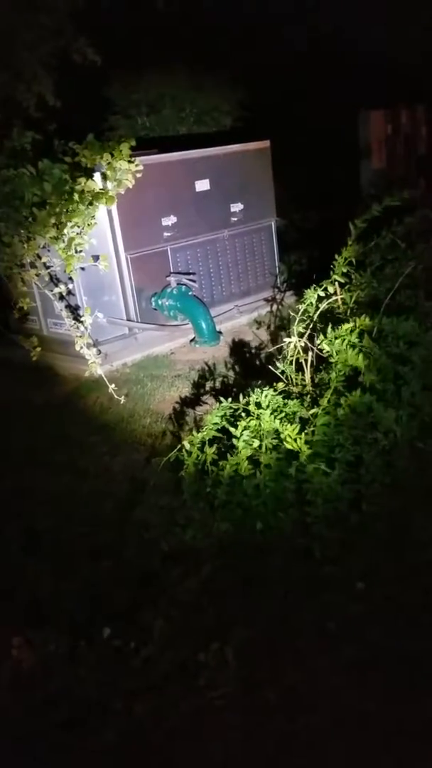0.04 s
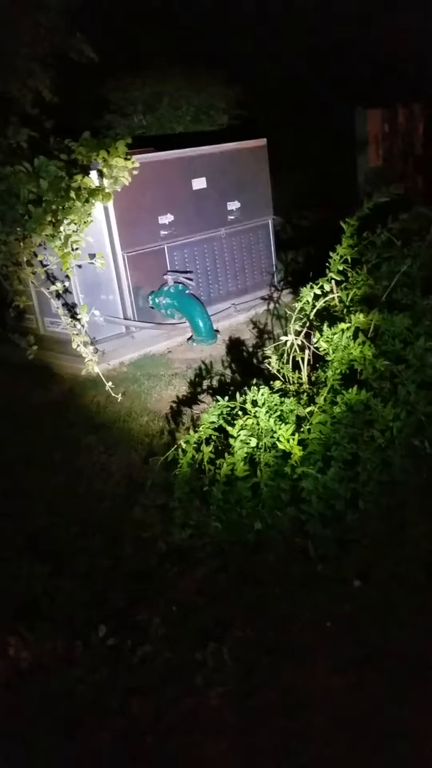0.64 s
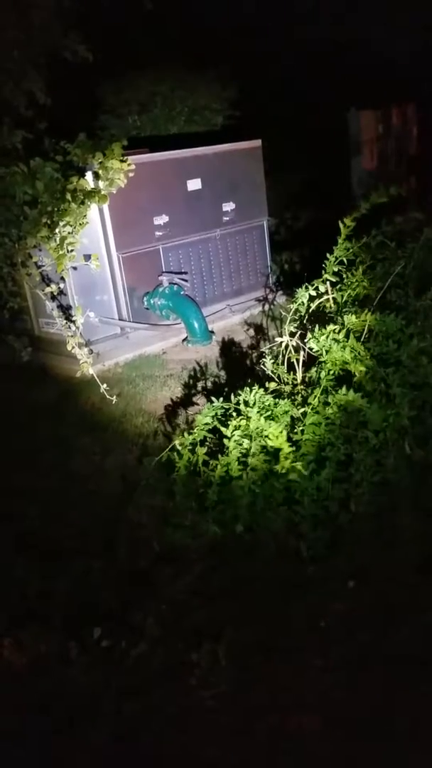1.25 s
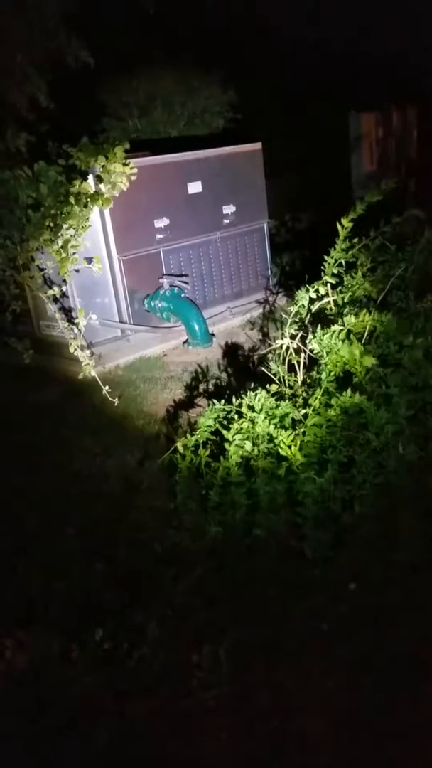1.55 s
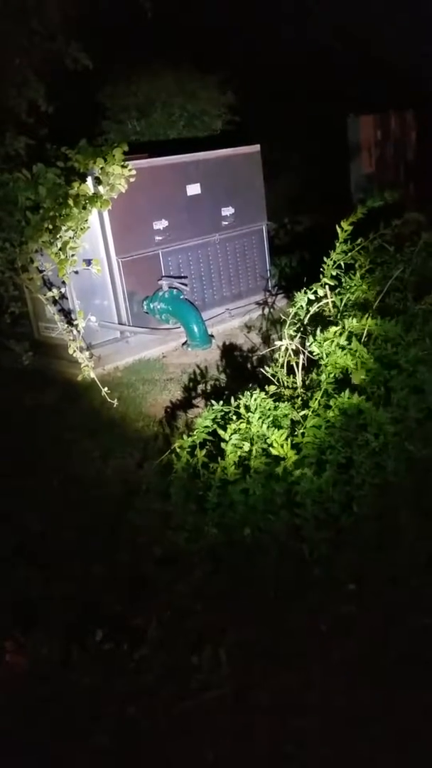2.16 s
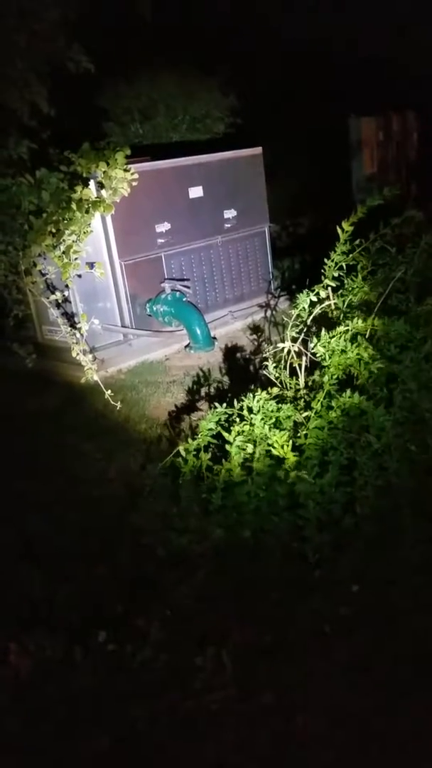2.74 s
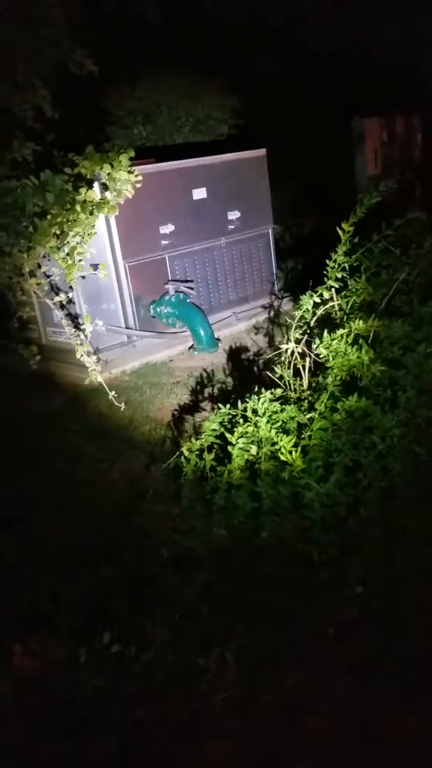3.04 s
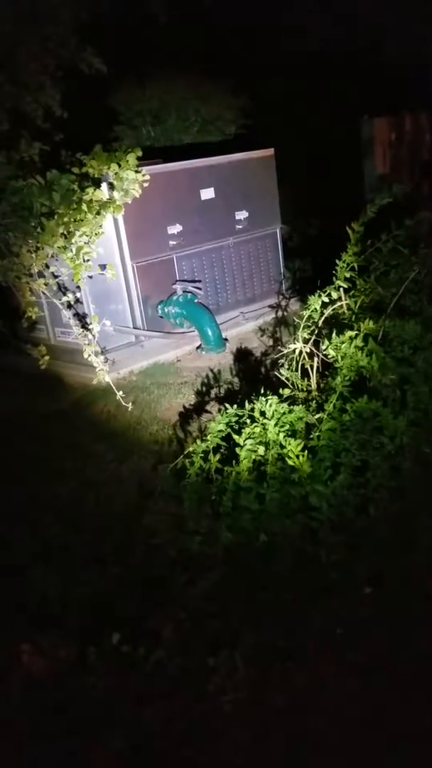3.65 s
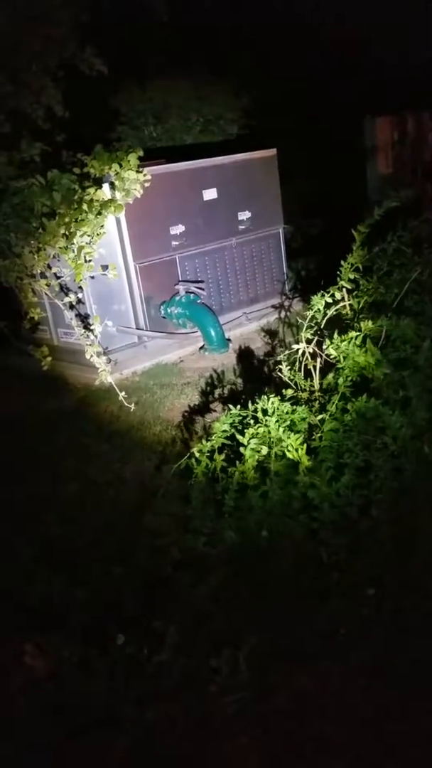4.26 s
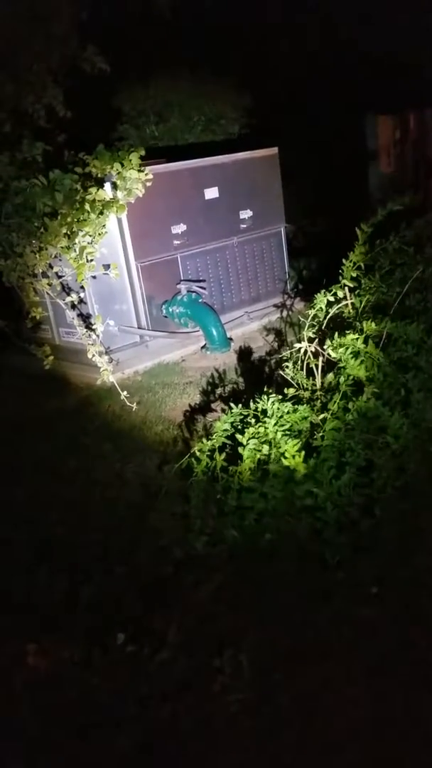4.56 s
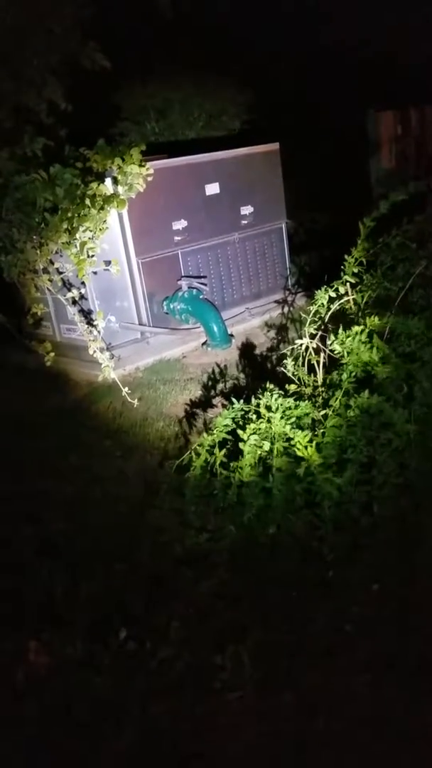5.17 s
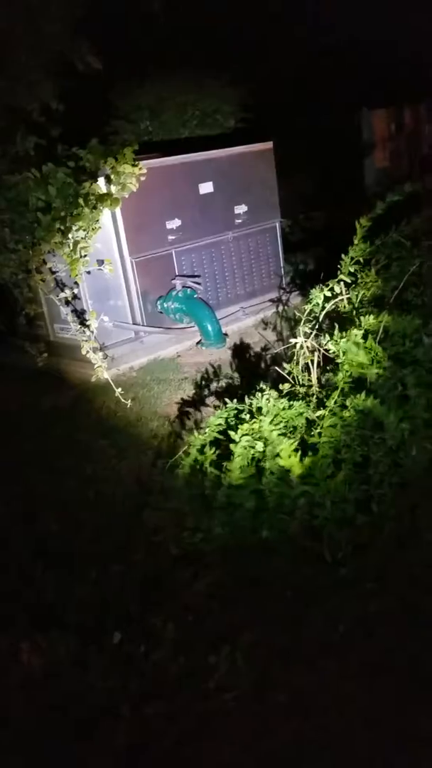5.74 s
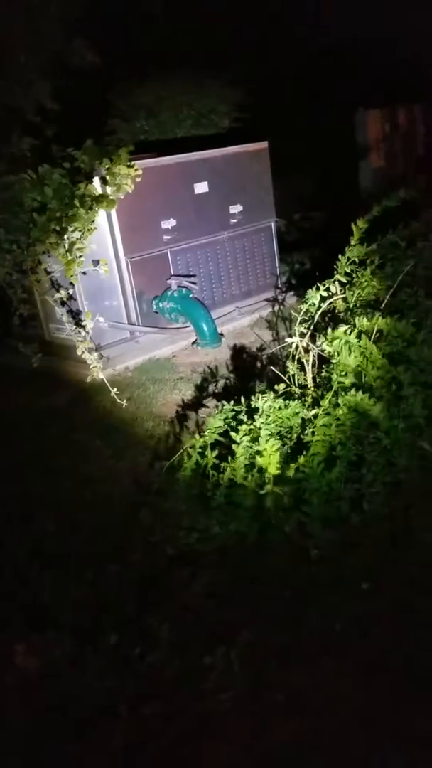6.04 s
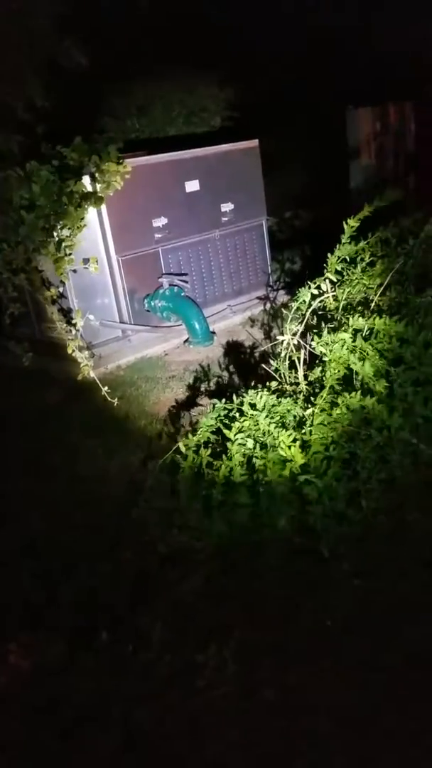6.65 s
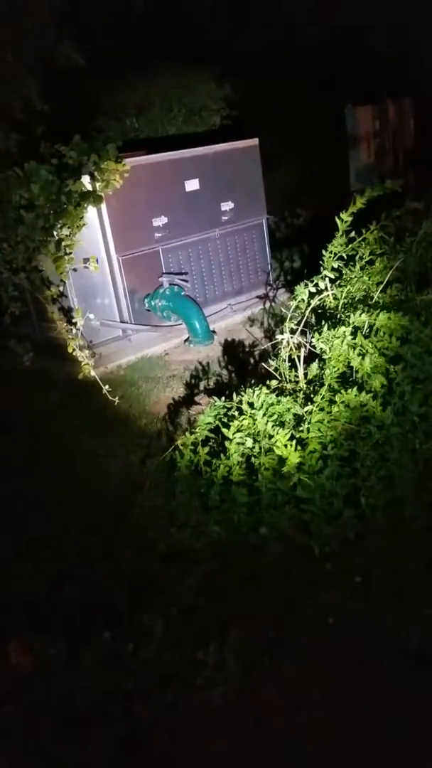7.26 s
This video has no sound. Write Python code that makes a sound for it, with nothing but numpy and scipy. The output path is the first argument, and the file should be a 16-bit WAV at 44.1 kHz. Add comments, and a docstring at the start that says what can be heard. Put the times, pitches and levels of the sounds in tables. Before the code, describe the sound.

A deep motor drone and an even rush of air and water come from a pump in an outdoor metal cabinet, heard from one spot, with a faint high whine on top. After a long steady run the drone falters, sinks slightly in pitch and booms as water swishes briefly. The whine blurs into hiss, the pipe whistles twice on one note, and the pump settles to a softer idle.

```python
"""Outdoors at night, a pump motor runs in a steel cabinet: a deep shaft hum, a rush of air and water,
a thin drive whine. Near the end the drive eases off: the shaft shake dies away, the third order sinks
into a cabinet resonance and booms, water swishes in the pipe and the whine smears into hiss.
Then the pipe sings, and the booming drone and the rush fall away as the pump drops to idle."""
import sys
import numpy as np
from scipy.fft import rfft, irfft, next_fast_len
from scipy.io import wavfile
from scipy.ndimage import map_coordinates

SR = 44100
rng = np.random.default_rng(int(sys.argv[2]) if len(sys.argv) > 2 else 0)


def persist_wave(psi):
    """Save psi, clipped to +-1, as 16-bit WAV."""
    counts = np.round(np.clip(psi, -1, 1) * 32767).astype(np.int16)
    wavfile.write(sys.argv[1], SR, np.atleast_2d(counts).T)


N = 330750

# The pump winds down in two steps: full load, eased, idle. Each fade spans twice its half-length.
EASE_S, EASE_HALF_S = 6.235, 0.0078
IDLE_S, IDLE_HALF_S = 6.92, 0.045


def amp(db):
    """Decibels to gain."""
    return 10 ** (np.asarray(db) / 20)


def unit(x):
    """Scale to rms 1."""
    return x / np.sqrt(np.mean(x ** 2) + 1e-20)


def along(points, hz):
    """Read a curve of (Hz, value) points on a log frequency axis."""
    freqs, values = np.transpose(points)
    return np.interp(np.log(hz + 1), np.log(freqs + 1), values)


def seconds():
    """The time of every sample."""
    return np.arange(N) / SR


def fade_in(centre_s, half_s):
    """A smooth step from 0 to 1 around centre_s."""
    return (1 + np.tanh((seconds() - centre_s) / half_s)) / 2


def swell(peak_s, half_s):
    """A smooth rise to 1 at peak_s and back."""
    return np.exp(-((seconds() - peak_s) / half_s) ** 2)


def wobble(rate):
    """A smooth random curve with `rate` knots a second."""
    knots = rng.standard_normal(int(N * rate / SR) + 4)
    return map_coordinates(knots, [np.arange(N) * rate / SR])


def load_fader(full_db, eased_db, idle_db, idle_lag_s=0):
    """Gain of a layer as the pump steps from full load to eased to idle."""
    eased = fade_in(EASE_S, EASE_HALF_S)
    idle = fade_in(IDLE_S + idle_lag_s, IDLE_HALF_S)
    return amp(full_db + (eased_db - full_db) * eased + (idle_db - eased_db) * idle)


def filtered(x, response):
    """Shape x with a complex response, a function of Hz."""
    size = next_fast_len(N + SR // 2)
    hz = np.fft.rfftfreq(size, 1 / SR)
    return irfft(rfft(x, size) * response(hz), size)[..., :N]


def bell(hz, centre_hz, width_hz):
    """The peak of one resonance, 1 at its centre."""
    return 1 / (1 + (2 * (hz - centre_hz) / width_hz) ** 2)


def stereo_noise(colour):
    """Coloured noise of rms 1: narrow through the mids, wider in the deep bass, widest in the treble."""
    # Each row: frequency in Hz, likeness of left and right from 0 to 1.
    likeness = [(40, 0.36), (100, 0.49), (150, 1), (300, 0.96), (520, 0.84), (780, 1), (1120, 0.94),
                (1400, 0.99), (2200, 0.96), (3000, 0.56), (4400, 0.11), (6000, 0.091), (14000, 0.12)]
    def mid_and_side(hz):
        spread = np.arccos(np.clip(along(likeness, hz), 0, 1)) / 2
        return colour(hz) * np.array([np.cos(spread), np.sin(spread)])
    mid, side = filtered(rng.standard_normal((2, N)), mid_and_side)
    return unit(np.array([mid + side, mid - side]))


def through_cabinet(spectrum):
    """Turbulence lifted at the resonances of cabinet and grille; many weaker modes ripple its colour."""
    # Each row: resonance in Hz, width in Hz, lift in dB.
    panels = [(354.3, 21, 13), (434, 15, 5), (559.5, 16, 6), (618, 25, 3.5), (670, 14, 6), (732, 18, 5),
              (775, 42, 2.5), (865, 65, 6), (987.3, 17.4, 10.5), (1155, 9.4, 9), (1271, 28, 6.5),
              (1468, 18, 6), (1553, 25, 7), (1750, 19, 7), (1910, 24, 4), (1998, 50, 4.5), (2174, 22, 3.5),
              (2730, 45, 1), (2922, 56, 7), (4035, 120, 5.5), (4600, 290, 6.5), (6000, 250, 2),
              (7460, 300, 5), (8220, 400, 4), (9400, 350, 3.5)]
    ripple_hz = np.arange(0, SR / 2, 22)
    ripple_db = 1.1 * rng.standard_normal(len(ripple_hz)) * (ripple_hz > 1000)
    def colour(hz):
        lift_db = sum(db * bell(hz, centre, width) for centre, width, db in panels)
        return amp(along(spectrum, hz) + lift_db + np.interp(hz, ripple_hz, ripple_db))
    return stereo_noise(colour)


def drone_gain():
    """The motor's drone falters, booms when the drive eases, slowly sags, and flutters at idle."""
    sag_db_per_s, flutter_hz = 4, 18
    since_ease_s = seconds() - EASE_S
    falter_db = 9.5 * np.exp(-np.abs(since_ease_s) / 0.11) * (1 - fade_in(EASE_S, EASE_HALF_S))
    sag_db = sag_db_per_s * np.maximum(since_ease_s, 0)
    flutter_depth = 0.58 * fade_in(IDLE_S, IDLE_HALF_S)
    flutter = flutter_depth * np.sin(2 * np.pi * flutter_hz * seconds() + wobble(3.8))
    waver_db = 0.22 * wobble(6.7)
    return load_fader(-13.5, -9, -20.5) * amp(waver_db - falter_db - sag_db) * (1 + flutter)


def motor():
    """Orders locked to the shaft throb once a turn; the third drives the cabinet as a loud drone."""
    # Each row: multiple of the shaft speed, relative level in dB.
    shake_orders = [(1, 1), (2, -20.5), (4, -3.5), (5, -15.5), (6, -42.5), (7, -29.5)]
    full_hz, eased_hz, slows_at_s = 62, 58.75, 6.17
    def settled(lag_s):
        return 1 - np.exp(-np.maximum(seconds() - slows_at_s, 0) / lag_s)
    speed_hz = full_hz + (eased_hz - full_hz) * settled(lag_s=0.09)
    shaft_angle = 2 * np.pi * np.cumsum(speed_hz) / SR + 0.012 * wobble(9)
    def order(k):
        lead = np.pi / 2 * (k % 2 == 0)  # even orders run a quarter cycle ahead
        return np.sqrt(2) * np.cos(k * shaft_angle + lead)
    shake = sum(amp(db) * order(k) for k, db in shake_orders)
    shake_db = -19.5 - 18.5 * settled(lag_s=0.17)  # dies away as the speed drops
    return amp(shake_db) * shake + drone_gain() * order(3)


def mains_hum(hum_hz=120):
    """The supply hums faintly at twice the mains frequency."""
    return load_fader(-34.5, -32, -28.5) * np.sin(2 * np.pi * hum_hz * seconds())


def casing_rumble():
    """Turbulence rumbles in the casing and keeps the cabinet's air resonance sounding unevenly."""
    # Each row: frequency in Hz, relative noise density in dB.
    rumble_spectrum = [(15, -23), (40, -10), (85, -4), (112, -8.5), (150, 0), (220, -3), (275, -1),
                       (330, -11), (400, -10.5), (460, -12), (500, -21), (700, -42), (1500, -88)]
    air_boom = stereo_noise(lambda hz: bell(hz, centre_hz=176, width_hz=24))
    rumble = through_cabinet(rumble_spectrum)
    return load_fader(-23.5, -20.5, -25) * rumble + load_fader(-30.5, -28, -25) * air_boom


def rush_and_spray():
    """Air and water rush behind the grille; fine spray in the pump flutters on top. Both surge."""
    # Each row of both: frequency in Hz, relative noise density in dB.
    rush_spectrum = [(300, -40), (495, -8.5), (560, -5), (660, -1.5), (900, -6.5), (1100, -7), (1480, -5.5),
                     (1720, -12.5), (2050, -3.5), (2300, -9.5), (2650, -16), (3500, -22.5), (4500, -31.5),
                     (15500, -74.5)]
    spray_spectrum = [(2000, -31.5), (3500, -3), (5000, -2), (6500, -6), (8000, -8.5), (9000, -14),
                      (10500, -12.5), (13500, -9.5), (15500, -16.5)]
    # Each row: peak of a flow surge in seconds, half-length in seconds, rush lift in dB, spray lift in dB.
    surges = [(5.992, .07, 1.5, 2), (6.174, .05, 2.3, 2), (6.443, 0.053, 2, 2.5), (6.893, 0.22, 0.4, 4.3)]
    flow_lag_s = 0.074  # the water reaches idle after the motor
    rush_db = 0.4 * wobble(12) + sum(db * swell(peak_s, half_s) for peak_s, half_s, db, _ in surges)
    flutter_db = 0.6 * wobble(10) + 0.7 * wobble(90)
    spray_db = flutter_db + sum(db * swell(peak_s, half_s) for peak_s, half_s, _, db in surges)
    rush = load_fader(-26, -27, -32, flow_lag_s) * amp(rush_db) * through_cabinet(rush_spectrum)
    spray = load_fader(-44.5, -47, -49, flow_lag_s) * amp(spray_db) * through_cabinet(spray_spectrum)
    waver_db = 0.33 * wobble(12)
    return amp(waver_db) * (rush + spray)


def drive_whine():
    """The drive's switching tones smear into a narrow hiss once it eases; the hiss steps up at idle."""
    # Each row: switching tone in Hz, relative level in dB.
    switching_tones = [(8683, -8.5), (11660, 0.5), (11789, -4.5), (11913, -7), (12037, -5.5), (12290, -5.5)]
    tones = np.zeros(N)
    for tone_hz, db in switching_tones:
        shimmer = amp(db + 2.5 * wobble(5))
        tones += shimmer * np.sin(2 * np.pi * tone_hz * seconds() + 0.8 * wobble(25))
    loaded_band = stereo_noise(lambda hz: bell(hz, centre_hz=11900, width_hz=900))
    idle_band = amp(3) * stereo_noise(lambda hz: bell(hz, centre_hz=12200, width_hz=900))
    idle = fade_in(IDLE_S, IDLE_HALF_S)
    band = (1 - idle) * loaded_band + idle * idle_band
    smear = fade_in(centre_s=6.55, half_s=0.1)
    tones_db = np.interp(smear, [0, 1], [-60.5, -78])
    band_db = np.interp(smear, [0, 1], [-70, -56.8])
    return amp(tones_db) * unit(tones) + amp(band_db) * band


def hiss_bed():
    """A faint even hiss lies under everything."""
    return amp(-63) * rng.standard_normal((2, N))


def pipe_swishes():
    """Short bands of noise glide upward as the flow in the pipe changes."""
    # Each row: peak in seconds, half-length in seconds, start Hz, end Hz, width in Hz, level in dB.
    swishes = [(6.117, 0.02, 1135, 1466, 201, -26), (6.158, 0.012, 1199, 1476, 300, -21.5),
               (6.2, 0.018, 1465, 1690, 296, -34.5), (6.426, 0.021, 1304, 1415, 890, -48)]
    water = np.zeros(N)
    for peak_s, half_s, start_hz, end_hz, width_hz, db in swishes:
        glide_hz = np.interp(seconds(), [peak_s - half_s, peak_s + half_s], [start_hz, end_hz])
        phase = 2 * np.pi * np.cumsum(glide_hz) / SR
        band = wobble(width_hz) * np.sin(phase) + wobble(width_hz) * np.cos(phase)
        water += amp(db) * swell(peak_s, half_s) * unit(band)
    return water


def pipe_whistle(pitch_hz=679):
    """The pipe sings twice on one wavering note as the flow dies down, then holds it faintly at idle."""
    # Each row: peak in seconds, half-length in seconds, level in dB.
    notes = [(6.774, 0.066, -30.5), (6.929, 0.039, -28)]
    swells = sum(amp(db) * swell(peak_s, half_s) for peak_s, half_s, db in notes)
    held = amp(-42) * fade_in(IDLE_S, IDLE_HALF_S)
    phase = 2 * np.pi * pitch_hz * seconds() + 0.35 * wobble(25)
    return (swells + held) * unit(np.sin(phase))


def scene():
    """Mix the pump and its pipe; each frequency reaches left and right at its own level and phase."""
    # Each row: frequency in Hz, left minus right level in dB.
    balance = [(60, -1), (200, -2.0), (360, -5), (480, -7.5), (630, 13), (830, -2.2), (1100, 2.2),
               (1450, 3.7), (1720, 5.5), (2000, -7), (2700, 1.5), (4300, 0.9), (7200, 11), (10000, 0),
               (12000, 6), (15000, 9)]
    # Each row: frequency in Hz, phase lead of the left side in radians.
    left_lead = [(240, 0.12), (400, 0.37), (540, 2.24), (660, 0.35), (820, 0.42), (1050, 1.4), (1550, 1.5),
                 (1800, 0.2), (2050, 1.83), (2350, 1.8), (2700, 3.89)]
    def stereo_image(hz):
        sides = np.array([[1], [-1]]) / 2
        pan = amp(sides * along(balance, hz))
        pan /= np.sqrt(np.mean(pan ** 2, axis=0))  # constant power
        return pan * np.exp(1j * sides * along(left_lead, hz))
    hum = motor() + mains_hum() + casing_rumble()
    flow = rush_and_spray() + pipe_swishes() + pipe_whistle()
    return filtered(hum + flow + drive_whine() + hiss_bed(), stereo_image)


def record(dry):
    """A brick-wall low-pass trims the very top of the treble."""
    cutoff_hz = 15790
    return filtered(dry, lambda hz: hz < cutoff_hz)


dry = scene()
out = record(dry)
persist_wave(out)
```